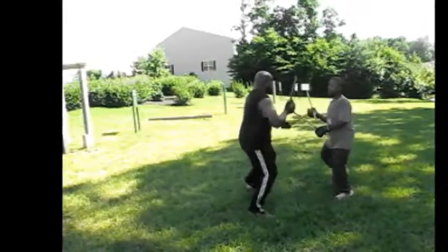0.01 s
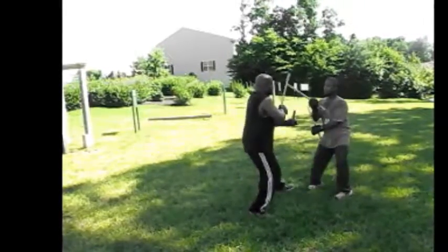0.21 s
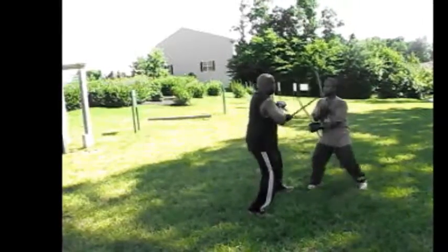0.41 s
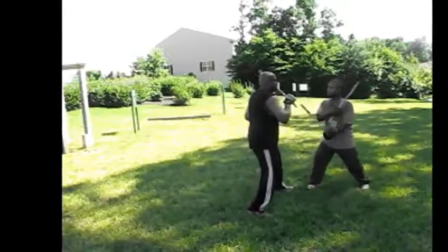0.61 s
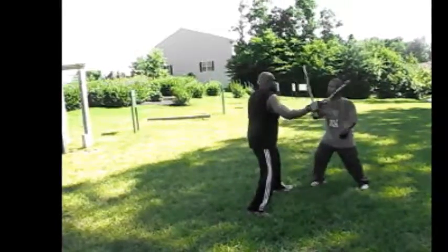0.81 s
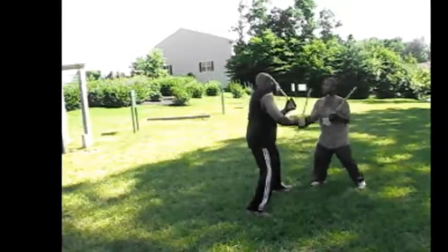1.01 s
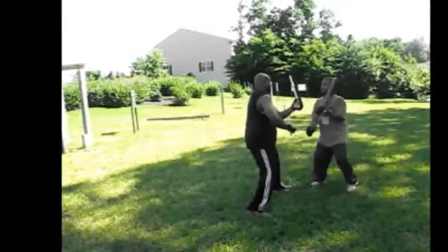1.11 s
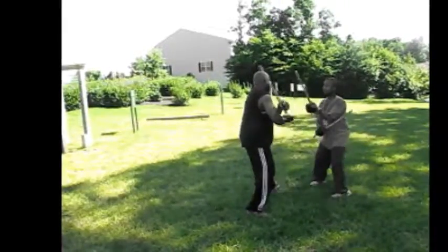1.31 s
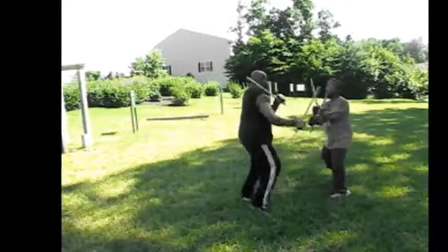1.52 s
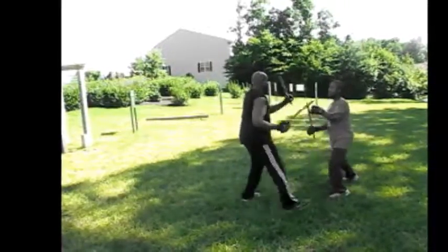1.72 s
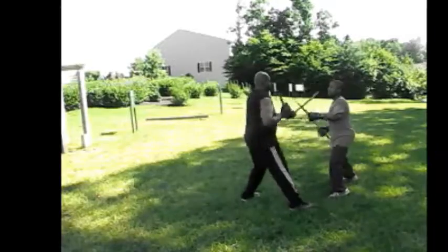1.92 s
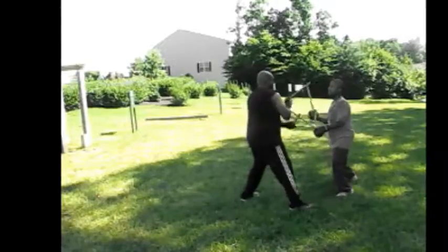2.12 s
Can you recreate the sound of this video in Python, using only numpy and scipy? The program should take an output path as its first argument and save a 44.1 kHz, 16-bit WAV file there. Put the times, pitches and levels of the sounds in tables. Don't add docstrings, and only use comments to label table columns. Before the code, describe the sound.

Two people's hard wooden sticks clack six times, about three a second, each strike a dry crack with quick echoes off house and trees; faint air and cloth swishes between, heard from some metres away outdoors.

```python
import sys
import numpy as np
from scipy import signal
from scipy.fft import rfft, irfft
from scipy.io import wavfile
from scipy.ndimage import uniform_filter1d

SR = 44100
rng = np.random.default_rng(int(sys.argv[2]) if len(sys.argv) > 2 else 0)


def wav_record(signal):
    frames = np.transpose(np.atleast_2d(signal))
    bounded = np.clip(frames, -1, 1)
    quanta = np.round(bounded * 32767).astype(np.int16)
    wavfile.write(sys.argv[1], SR, quanta)


def amplitude_ratio(level_db):
    exponent = np.asarray(level_db, float) / 20
    return 10 ** exponent


N = 94815
LEAD = 4410

# pitch_hz [Hz], density_db [dB per Hz]
AIR_SPECTRUM = [(15, -11.5), (25, -12), (80, -5.5), (476, -13), (659, -7.5), (2350, -13.5), (3520, -14.5),
                (7920, -33.5), (16000, -38)]
# pitch_hz [Hz], side_over_mid_db [dB]
AIR_WIDTH = [(60, -20.5), (110, -11), (200, -11.5), (380, -11.5), (700, -7.5), (1290, -5), (2380, -3.5),
             (4400, 3), (8120, 2.5), (15000, 4)]
AIR_DB, AIR_FLICKER_DB = -60, -0.5
LULL_S, LULL_LEN_S, LULL_DB = 0.4, 0.14, -9

# time_s [s], level_db [dB], pitch_hz [Hz]
THROB_PATH = [(0, -89, 80.5), (.18, -73.5, 76.06), (.26, -86, 73.7), (.54, -84, 77.2), (.59, -56, 69),
              (.66, -67, 60.9), (.73, -76, 59), (.85, -59.5, 64.8), (.92, -72, 76.3), (1.04, -60, 77.2),
              (1.13, -67, 62.4), (1.3, -61.5, 68.9), (1.45, -73, 61.8), (1.6, -59, 65.2),
              (1.68, -74.5, 62.8), (1.78, -60, 63), (1.9, -69.5, 62), (2.05, -75, 57.5)]
THROB_ROUGH, THROB_PAN_DB, THROB_SIDE_DB = 0.11, 0.5, -19.5
HUM_HZ, HUM_WIDTH_HZ, HUM_DB = 231, 10, -79

TICK_START_S = [.093, .2245, .229, .3505, .5023, 1.0375, 1.1912, 1.5085, 1.609, 2.135]
# level_db [dB], centre_hz [Hz], length_s [s]
TICK_SHAPES = [(-57, 1700, 0.0034), (-50, 3200, 0.0037), (-47, 1100, .002), (-57, 3100, 0.0018),
               (-53, 2200, 0.0018), (-52, 3600, .002), (-54, 1560, 0.0026), (-49.5, 2480, 0.0063),
               (-47.5, 2300, .004), (-58, 2100, 0.0039)]
TICK_WIDE = 1.1

# peak_s [s], level_db [dB], rise_s [s], fall_s [s]
SWISH_EVENTS = [(.01, -70.5, .02, 0.054), (0.21, -64, 0.072, 0.021), (0.577, -70.5, .015, .015),
                (0.895, -69.5, 0.062, .012), (.98, -73.5, .03, .06), (1.18, -73, 0.093, .04),
                (1.304, -62.5, 0.017, .025), (1.43, -68.5, 0.068, 0.1), (1.64, -70.5, .03, 0.07),
                (1.785, -68.5, 0.057, .04), (1.93, -77, .02, .03), (2.09, -72.5, 0.05, .015)]
SWISH_HZ, SWISH_WIDTH_HZ, SWISH_PATCHY_DB, SWISH_TILT_DB = 9300, 8700, 1.5, -4

BIRD_S, BIRD_LEN_S, BIRD_DB = 0.764, 0.032, -65
BIRD_HZ, BIRD_ARCH_HZ, BIRD_FALL_HZ = 4700, 750, -500
QUIET_TOP_HZ = 15750

SLAP_DELAY_S = [
    .017,
    .0335,
    .045,
    .0533,
]
SLAP_SIDE_DB = [0, 0, 1, 4]
# near_post_db, far_post_db, fence_db, wall_db [dB]
BLOW_SLAPS_DB = [(-55, -48.5, -60, -55), (-42, -42, -36, -32.5), (-42.5, -43, -39.5, -32),
                 (-43, -46, -47, -35), (-48, -38, -42.5, -43), (-51, -52, -59, -41.5)]
# low_db, middle_db, high_db, bush_share_db [dB]
BLOW_THROW_DB = [(3, -11, -12, -3.5), (-1.5, -4.5, -7.5, 0), (0, 6.5, 1, 1), (0.5, -1, -8, -2.5),
                 (-2, -2.5, 0, -3), (0.5, -2, -9, -4)]
THROW_BAND_HZ = [2000, 3900, 7000]
SLAP_BLUR_S = 0.001
BUSH_S, BUSH_RISE_S, BUSH_T60_S, BUSH_DB = 0.028, 0.018, 0.092, -22.5
TREES_S, TREES_RISE_S, TREES_T60_S, TREES_DB = 0.02, 0.15, 0.95, -20
ECHO_LIKENESS, ECHO_LOW_HZ, ECHO_TOP_HZ = 0.16, 905, 6980

# pitch_hz [Hz], level_db [dB], t60_s [s]
MODES_1 = [(974, -26, 0.04), (1475, -31, 0.032), (1988, -21, 0.05), (2580, -14, 0.028), (3280, 0, 0.015),
           (4113, 4, 0.009), (4470, -12, 0.017), (4674, 5, 0.006), (6450, -24, 0.012), (6760, -18, 0.01),
           (9110, -35.5, 0.008), (12200, -7.5, 0.0034)]
MODES_2 = [(1210, -7, 0.014), (1843, 1, 0.011), (2260, 7.5, 0.0049), (2710, -2.5, 0.022),
           (3580, -0.5, 0.012), (3760, -30, 0.018), (4290, -49, 0.0057), (5000, -13, 0.021)]
MODES_3 = [(1532, -5, 0.021), (1950, -5.5, 0.026), (2735, -4, 0.013), (3310, -5, 0.015), (4122, 0, 0.023),
           (4460, -11.5, 0.012), (5520, -13.5, 0.0066), (6380, -1, 0.0056), (7150, -27, 0.02),
           (9250, -14, .008), (11900, -23, .005)]
MODES_4 = [(690, -20.5, .025), (920, -15, 0.029), (1465, -8, 0.02), (1569, -16, .045), (2010, -8.5, 0.045),
           (2090, -3.5, 0.012), (2790, -3.5, 0.016), (3040, -4, 0.013), (3570, -2.5, 0.015),
           (4480, -6.5, .012), (5800, -8, 0.007), (6900, -20.5, .01), (8400, -18, .01),
           (1180, -14.5, 0.023)]
MODES_5 = [(1499, -10, 0.021), (1825, -5, 0.017), (2620, -12.5, 0.027), (3350, -1, 0.0093),
           (4240, 5, 0.0047), (4860, 0.5, 0.008), (5880, -6, 0.0076), (6300, -20.5, 0.0048),
           (7170, -41, 0.012)]
MODES_6 = [(775, -15.5, 0.035), (1333, -10.5, 0.053), (1710, -5, 0.035), (2064, -13.5, 0.039),
           (2345, -2, 0.02), (2585, -0.5, 0.02), (2890, -4, 0.025), (3520, -2, 0.016), (3920, 1, 0.0081),
           (5020, -5, 0.018), (6130, -25, 0.0058)]
# ring_db [dB], crack_db [dB], crack_hz [Hz]
CONTACTS_1 = [(-7.5, -7.5, 4600), (-19.5, -11.5, 2600)]
CONTACTS_2 = [(-20.5, -14, 3130), (-32, -29.5, 6300), (-31, -16, 2160)]
CONTACTS_3 = [(-17.5, -20.5, 8400), (-23.5, -5, 3320), (-16.5, -28, 5800)]
CONTACTS_4 = [(-13.5, 3.5, 3680), (-21, -3, 3400), (-17.5, 3, 2690)]
CONTACTS_5 = [(-14, 0.5, 5000), (-23.5, 5, 2740), (-12, -6.5, 2050)]
CONTACTS_6 = [(-21.5, -4.5, 4920), (-15.5, 2, 2870)]
CONTACT_TIMES_S = [(.24175, .2449), (.53205, .5336, .5360), (.9299, .9312, .9330),
                   (1.24675, 1.2474, 1.2481), (1.5907, 1.5920, 1.5940), (1.87555, 1.8764)]
BLOW_SIDE_DB = [0, -0.28, -1.2, -0.5, -1, -2]
BLOW_SCATTER_DB = [-17.5, -12, -11, -14.5, -16.5, -18]
BLOW_EDGE_DB = [-14.5, -18.5, -14.5, -18, -24.5, -28]
MODES = (MODES_1, MODES_2, MODES_3, MODES_4, MODES_5, MODES_6)
CONTACTS = (CONTACTS_1, CONTACTS_2, CONTACTS_3, CONTACTS_4, CONTACTS_5, CONTACTS_6)
EARLIER_S, EARLIER_DB = -0.098, -4
GRIP_T60_S, GRIP_FADE_S = 0.03, 0.014
CRACK_WIDE, KNOCK_DB, KNOCK_HZ = 0.96, -26.5, 786
CONTACT_TOP_HZ, LATE_TOP_HZ, LOW_CUT_HZ = 16960, 11100, 450
SCATTER_S, SCATTER_T60_S, SCATTER_SIDE_DB = 0.003, 0.02, 0.5
LEFT_LAG = 0.63
OPPOSITE = np.array([[1], [-1]])


def band(x, hz, width_hz, order=1):
    lo = np.sqrt(hz ** 2 + width_hz ** 2 / 4) - width_hz / 2
    edges = [lo, min(lo + width_hz, 20000)]
    return signal.sosfilt(signal.butter(order, edges, "band", fs=SR, output="sos"), x)


def unit(x):
    return x / np.sqrt(np.mean(x ** 2))


def pan(db):
    return amplitude_ratio(np.array([[db], [-db]]) / 2)


def read(table, hz):
    table_hz, table_db = np.array(table).T
    return np.interp(np.log(hz + 1), np.log(table_hz), table_db)


def walk(rate):
    k = int(SR / rate)
    steps = np.repeat(rng.standard_normal(N // k + 1), k)
    return unit(uniform_filter1d(steps, k)[:N])


def air():
    f = np.fft.rfftfreq(N, 1 / SR)
    mid, side = rfft(rng.standard_normal((2, N))) * amplitude_ratio(read(AIR_SPECTRUM, f))
    side = side * amplitude_ratio(read(AIR_WIDTH, f))
    both = np.array([mid + side, mid - side])
    lull_db = LULL_DB * np.exp(-((np.arange(N) / SR - LULL_S) / LULL_LEN_S) ** 4)
    octave = np.log2(f / 30 + 1e-9)
    out = 0
    for k in range(11):
        share = np.cos(np.clip(octave - k, -1, 1) * np.pi / 2) ** 2
        lull_share = np.clip(1.3 - k / 4, 0, 1)
        gain = amplitude_ratio(AIR_FLICKER_DB * walk(4.2) + lull_db * lull_share)
        out = out + gain * irfft(both * share, N)
    return amplitude_ratio(AIR_DB) * unit(out)


def engine(t):
    s, db, hz = np.array(THROB_PATH).T
    level = amplitude_ratio(np.interp(t, s, db))
    pitch = np.interp(t, s, hz) * (1 + 0.051 * walk(26))
    tone = np.sin(2 * np.pi * np.cumsum(pitch) / SR)
    throb = np.sqrt(2) * level * tone * (1 + THROB_ROUGH * walk(19))
    rumble = amplitude_ratio(THROB_SIDE_DB) * level * unit(band(rng.standard_normal(N), 65, 40)) * OPPOSITE
    hum = amplitude_ratio(HUM_DB) * unit(band(rng.standard_normal(N), HUM_HZ, HUM_WIDTH_HZ))
    return pan(THROB_PAN_DB) * throb + rumble + hum


def bird(t):
    u = np.clip((t - BIRD_S) / BIRD_LEN_S, 0, 1)
    hz = BIRD_HZ + BIRD_ARCH_HZ * np.sin(np.pi * u ** 0.71) + BIRD_FALL_HZ * u
    return amplitude_ratio(BIRD_DB) * np.sin(np.pi * u) ** 0.5 * np.sin(2 * np.pi * np.cumsum(hz) / SR)


def swishes(t):
    swing = 0
    for s, db, rise, fall in SWISH_EVENTS:
        swing = swing + amplitude_ratio(db) * np.exp(-((t - s) / np.where(t < s, rise, fall)) ** 2)
    cloth = rng.standard_normal((2, N)) + 1.9 * rng.standard_normal(N)
    out = np.zeros((2, N))
    for octave in (-1, 0, 1):
        wide = 2 ** (octave * 0.81)
        patchy = amplitude_ratio(SWISH_TILT_DB * abs(octave) + SWISH_PATCHY_DB * walk(30))
        hiss = unit(band(cloth, SWISH_HZ * wide, 0.5 * SWISH_WIDTH_HZ * wide, order=2))
        out += swing * patchy * hiss
    return out


def ticks(t):
    out = np.zeros(N)
    for s, (db, hz, length) in zip(TICK_START_S, TICK_SHAPES):
        u = np.maximum(t - s, 0) / length
        pulse = u * np.exp(1 - u ** 2)
        width_hz = TICK_WIDE * np.clip(hz, 1200, 3200)
        out += amplitude_ratio(db) * pulse * unit(band(rng.standard_normal(N), hz, width_hz, order=3))
    return out


def swell(t, start_s, rise_s, t60_s, db):
    u = np.maximum(t - start_s, 0)
    return amplitude_ratio(db) * (1 - np.exp(-u / rise_s)) * 1000. ** (-u / t60_s) / np.sqrt(t60_s * SR / 14)


def garden(slaps_db, bush_db):
    t = np.arange(SR) / SR
    mid, side = rng.standard_normal((2, SR))
    leaves = np.sqrt((1 + ECHO_LIKENESS) / 2) * mid + np.sqrt((1 - ECHO_LIKENESS) / 2) * side * OPPOSITE
    bushes = swell(t, BUSH_S, BUSH_RISE_S, BUSH_T60_S, BUSH_DB + bush_db)
    trees = swell(t, TREES_S, TREES_RISE_S, TREES_T60_S, TREES_DB)
    ir = leaves * (bushes + trees)
    for s, db, pan_db in zip(SLAP_DELAY_S, slaps_db, SLAP_SIDE_DB):
        blur = 0.2 * mid * (t > s) * np.exp(-np.abs(t - s) / SLAP_BLUR_S)
        ir = ir + amplitude_ratio(db) * pan(pan_db) * (np.sinc((t - s) * SR) + blur)
    return band(ir, np.sqrt(ECHO_LOW_HZ * ECHO_TOP_HZ), ECHO_TOP_HZ - ECHO_LOW_HZ)


def echo(hit, throw, slaps_db):
    sent = 0
    for db, hz in zip(throw, THROW_BAND_HZ):
        sent = sent + amplitude_ratio(db) * band(hit.mean(0), hz, 0.76 * hz)
    return signal.fftconvolve(garden(slaps_db, throw[3]), sent[None], axes=1)[:, :N + LEAD]


def ringing(t, modes):
    tone = 0
    for m, (hz, db, t60) in enumerate(modes):
        decay = 1000. ** (-t / min(t60, GRIP_T60_S))
        tone = tone + (-1) ** m * amplitude_ratio(db) * np.sin(2 * np.pi * hz * t) * decay
    return tone * np.exp(-(t / GRIP_FADE_S) ** 2)


def scatter(hit, scatter_db):
    t = np.arange(1500) / SR
    envelope = np.minimum(t / SCATTER_S, 1) ** 2 * 1000. ** (-t / min(SCATTER_T60_S, GRIP_T60_S))
    mid, side = rng.standard_normal((2, len(t))) * envelope
    near = mid + amplitude_ratio(SCATTER_SIDE_DB) * side * OPPOSITE
    near = near * amplitude_ratio(scatter_db) / np.sqrt(np.sum(mid ** 2))
    return band(signal.fftconvolve(hit, near, axes=1)[:, :3000], 3200, 7300)


def blow(times, contacts, modes, pan_db, scatter_db, edge_db):
    start = int(times[0] * SR) + LEAD - 16
    hit = 0
    for j, (s, (ring_db, crack_db, crack_hz)) in enumerate(zip(times, contacts)):
        k = np.arange(3000) - (s * SR + LEAD - start) - np.array([[LEFT_LAG], [0]])
        click = np.sinc(k) * (np.abs(k) < 16)
        crack = 4 * band(click, crack_hz, CRACK_WIDE * crack_hz, order=2)
        crack = crack + amplitude_ratio(KNOCK_DB) * 10 * band(click, KNOCK_HZ, 720)
        if j == 0:
            crack = crack + amplitude_ratio(edge_db) * 4 * band(click, 7900, 7600)
        contact = amplitude_ratio(ring_db) * ringing(np.maximum(k, 0) / SR, modes) + amplitude_ratio(crack_db) * crack
        top_hz = LATE_TOP_HZ if j else CONTACT_TOP_HZ
        hit = hit + signal.sosfilt(signal.butter(2, top_hz, fs=SR, output="sos"), contact)
    hit = hit + scatter(hit, scatter_db)
    low_cut = signal.butter(4, LOW_CUT_HZ, "high", fs=SR, output="sos")
    out = np.zeros((2, N + LEAD))
    out[:, start:start + 3000] = pan(pan_db) * signal.sosfilt(low_cut, hit)
    return out


def sticks():
    times = CONTACT_TIMES_S[3]
    earlier = [s - times[0] + EARLIER_S for s in times]
    hit = blow(earlier, CONTACTS[3], MODES[3], 0, BLOW_SCATTER_DB[3], BLOW_EDGE_DB[3])
    out = amplitude_ratio(EARLIER_DB) * echo(hit, BLOW_THROW_DB[3], BLOW_SLAPS_DB[3])
    rows = zip(CONTACT_TIMES_S, CONTACTS, MODES, BLOW_SIDE_DB, BLOW_SCATTER_DB, BLOW_EDGE_DB)
    for row, throw, slaps_db in zip(rows, BLOW_THROW_DB, BLOW_SLAPS_DB):
        hit = blow(*row)
        out = out + hit + echo(hit, throw, slaps_db)
    return out[:, LEAD:]


def scene():
    t = np.arange(N) / SR
    quiet = air() + bird(t) + swishes(t) + ticks(t)
    top = signal.ellip(10, 0.5, 60, QUIET_TOP_HZ, fs=SR, output="sos")
    return signal.sosfilt(top, quiet) + engine(t) + sticks()


def low_pass(x):
    return signal.sosfilt(signal.butter(12, 16790, fs=SR, output="sos"), x)


def record(dry):
    clipped = np.clip(dry, -1, 1)
    treble_cut = signal.ellip(8, 0.1, 60, 16500, fs=SR, output="sos")
    mix = signal.sosfilt(treble_cut, clipped)
    return low_pass(mix)


dry = scene()
out = record(dry)
wav_record(out)
```